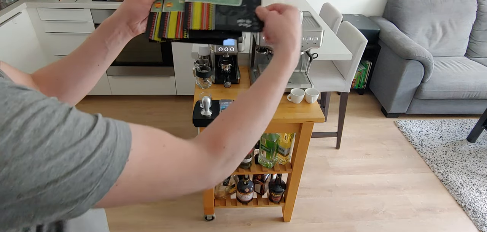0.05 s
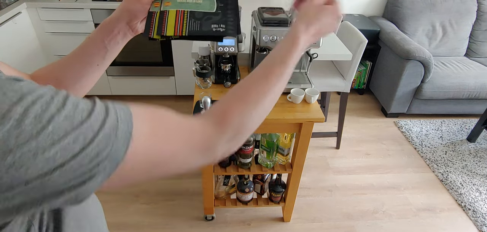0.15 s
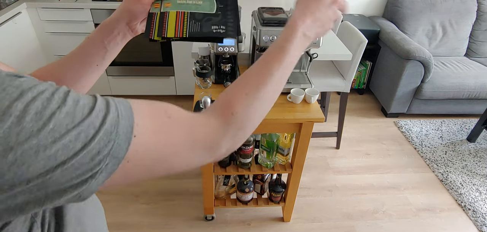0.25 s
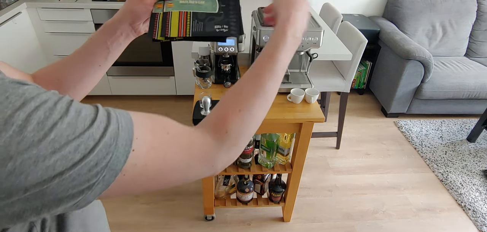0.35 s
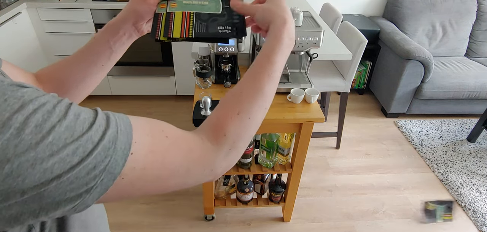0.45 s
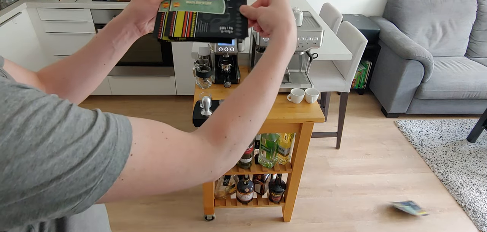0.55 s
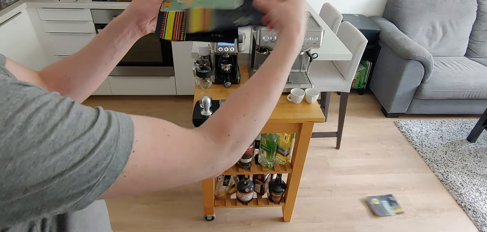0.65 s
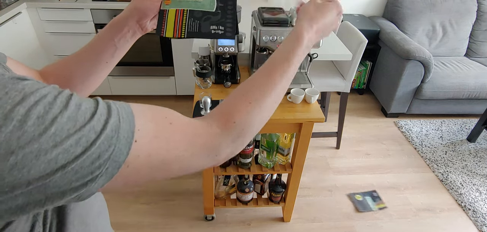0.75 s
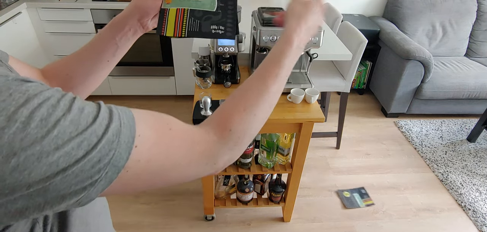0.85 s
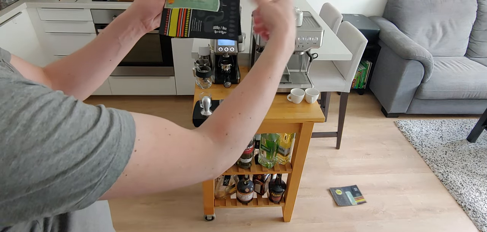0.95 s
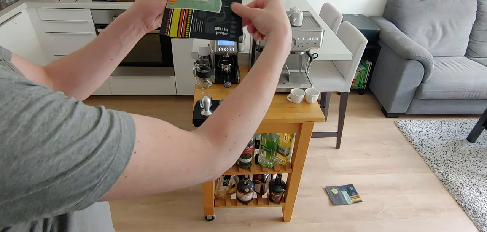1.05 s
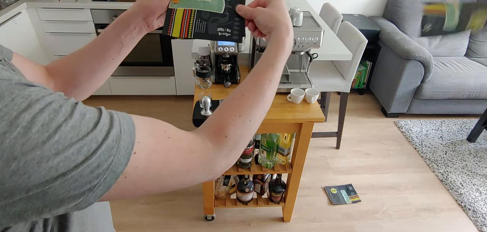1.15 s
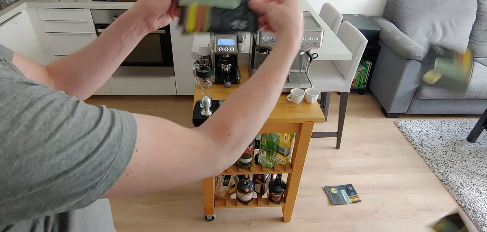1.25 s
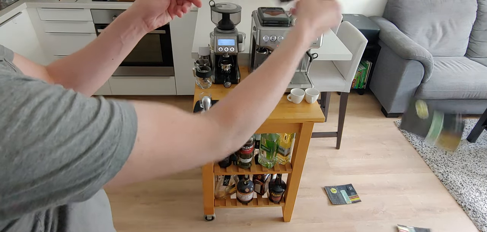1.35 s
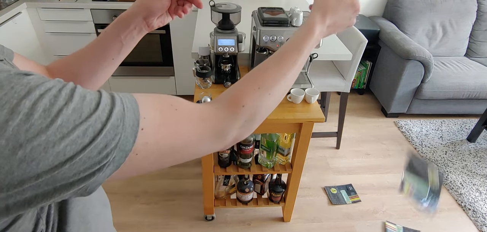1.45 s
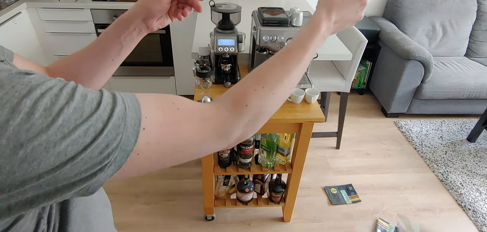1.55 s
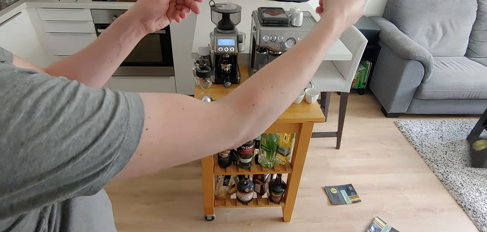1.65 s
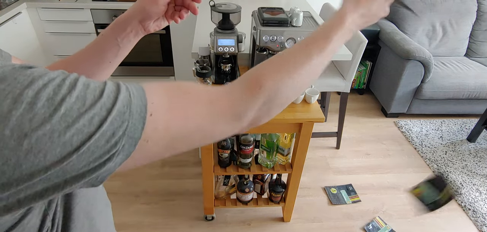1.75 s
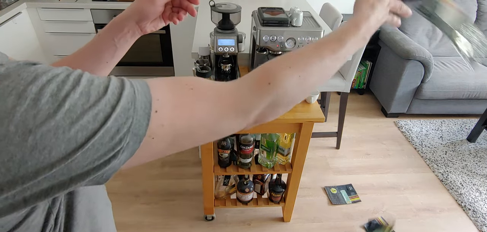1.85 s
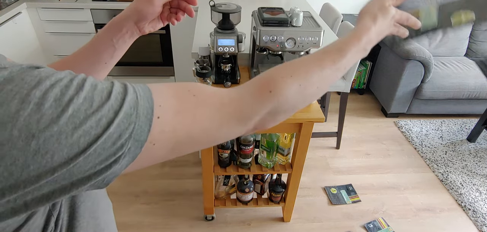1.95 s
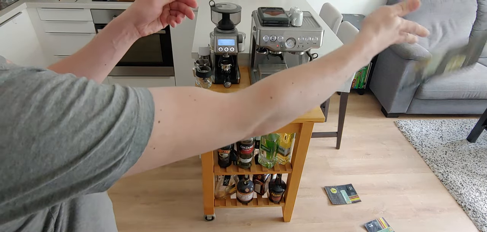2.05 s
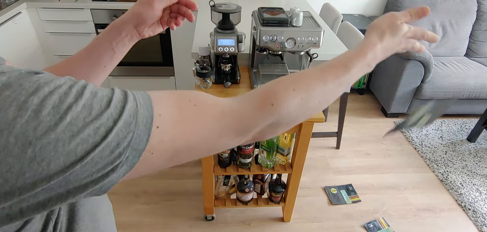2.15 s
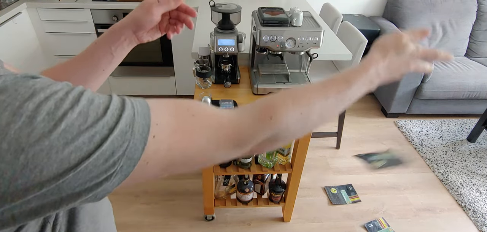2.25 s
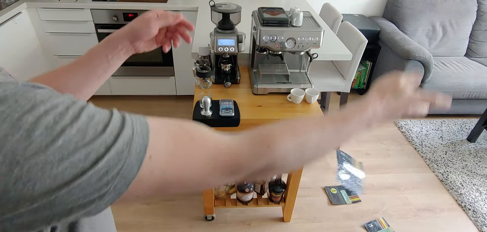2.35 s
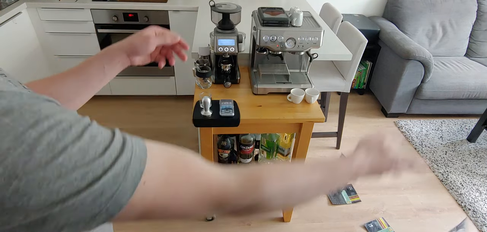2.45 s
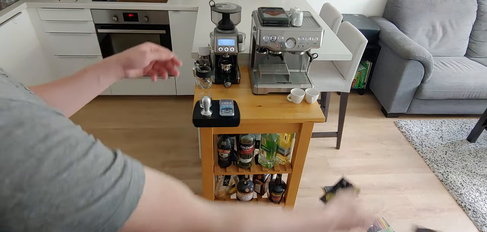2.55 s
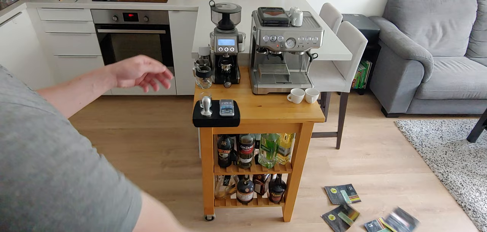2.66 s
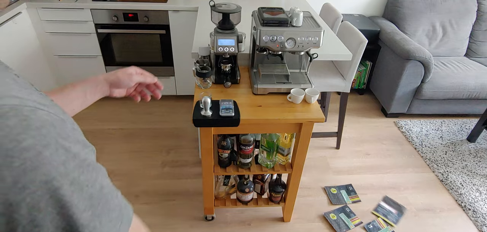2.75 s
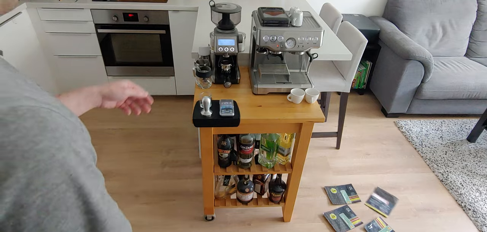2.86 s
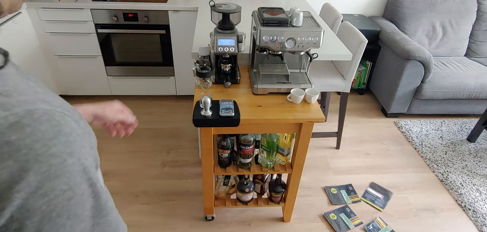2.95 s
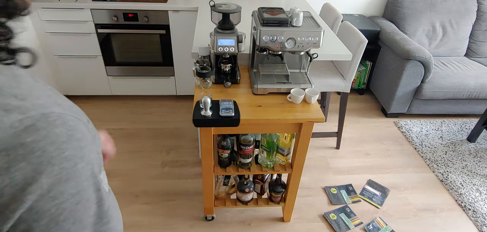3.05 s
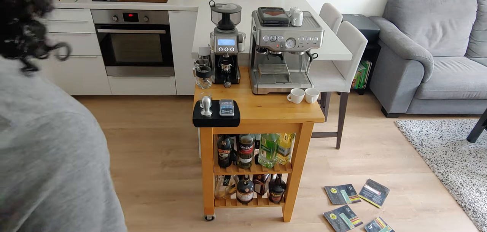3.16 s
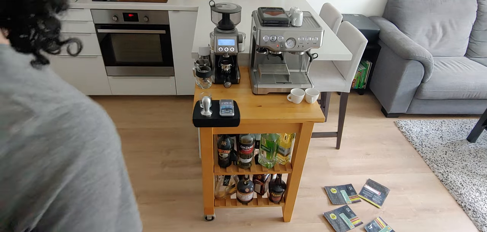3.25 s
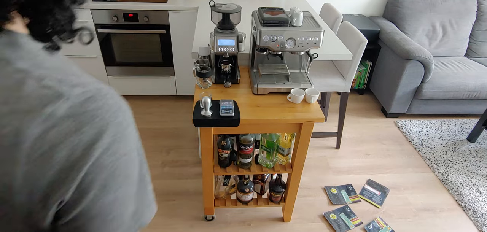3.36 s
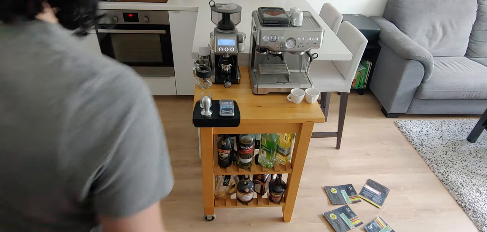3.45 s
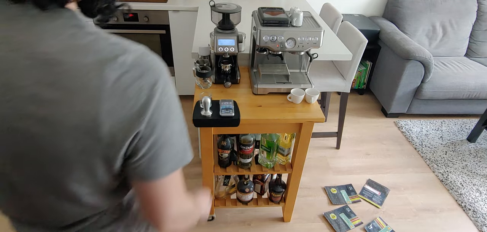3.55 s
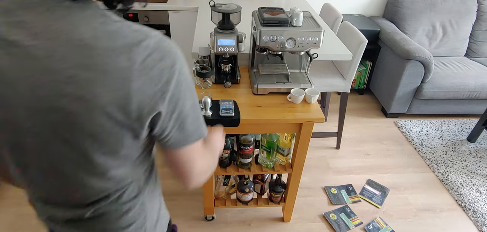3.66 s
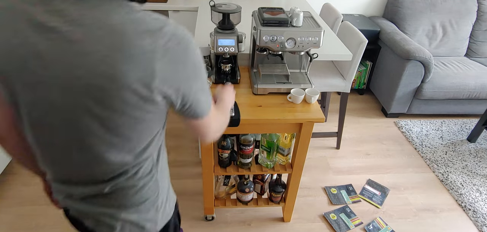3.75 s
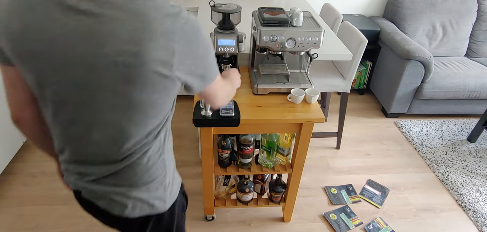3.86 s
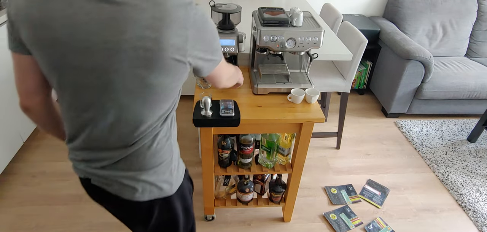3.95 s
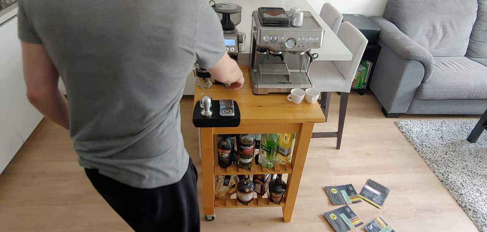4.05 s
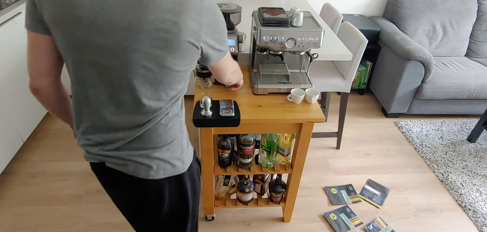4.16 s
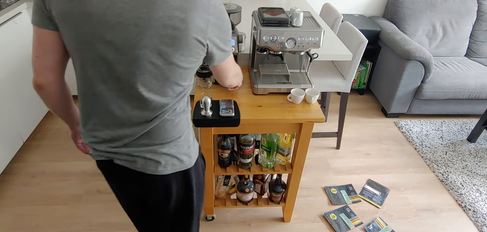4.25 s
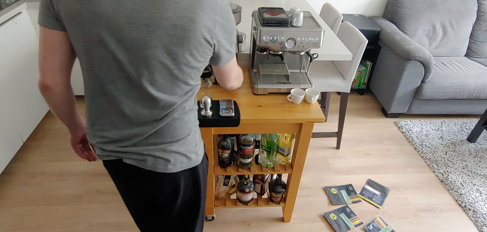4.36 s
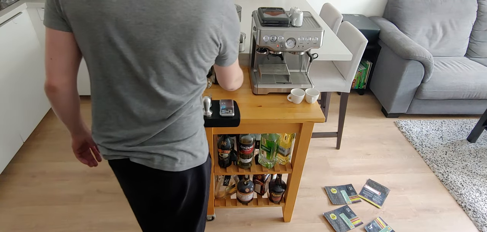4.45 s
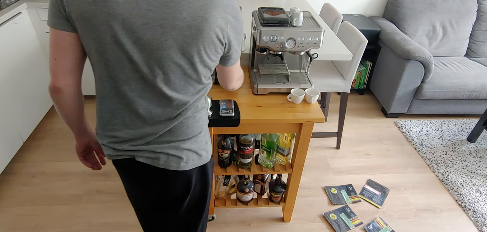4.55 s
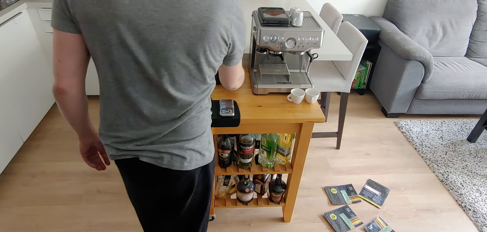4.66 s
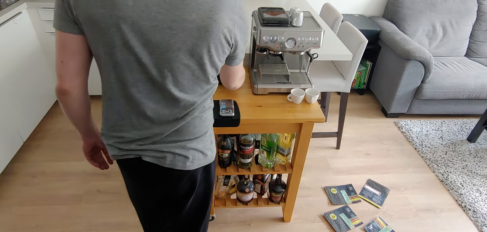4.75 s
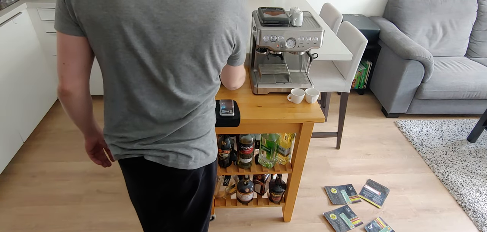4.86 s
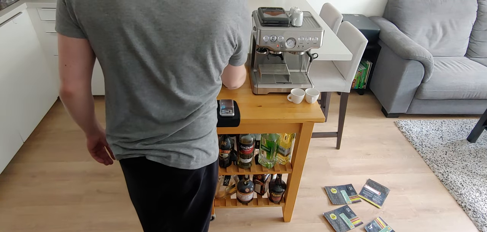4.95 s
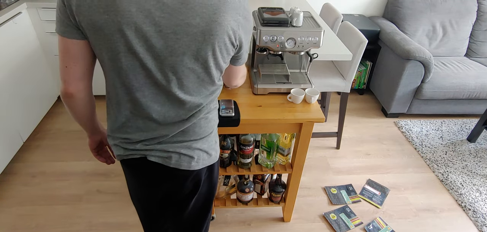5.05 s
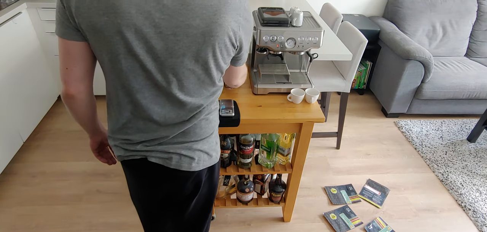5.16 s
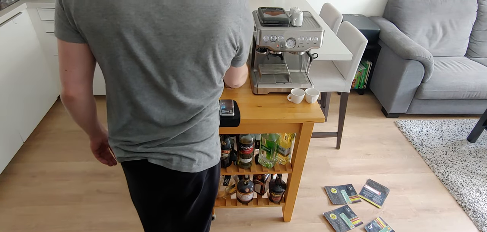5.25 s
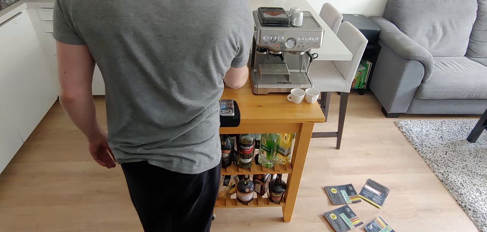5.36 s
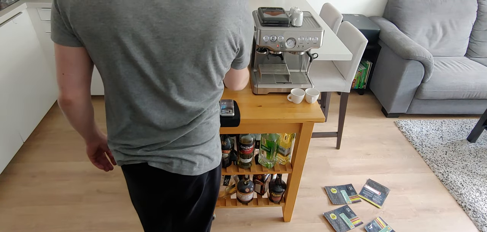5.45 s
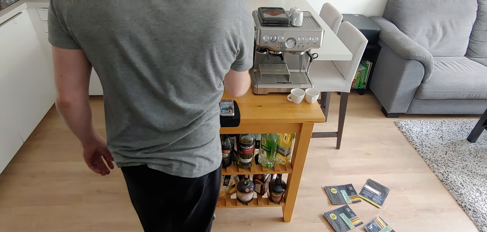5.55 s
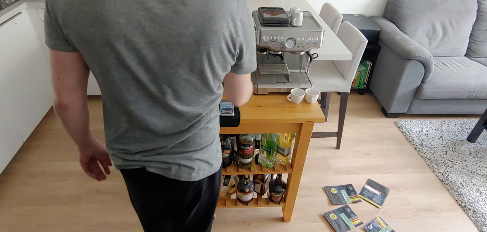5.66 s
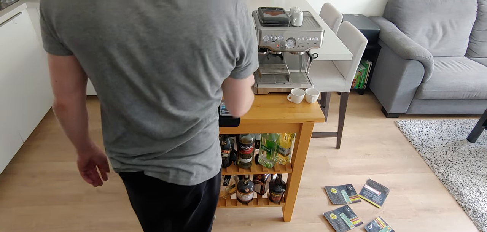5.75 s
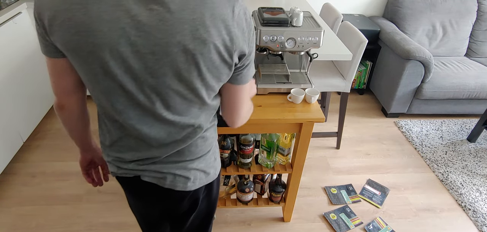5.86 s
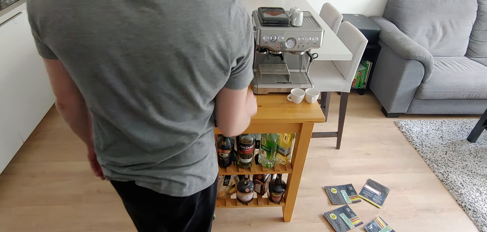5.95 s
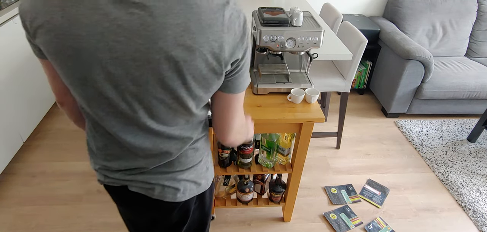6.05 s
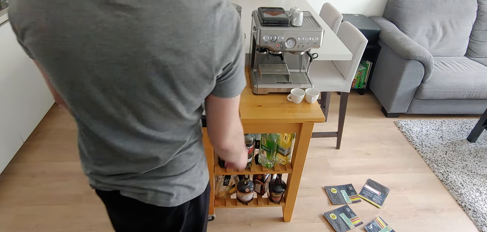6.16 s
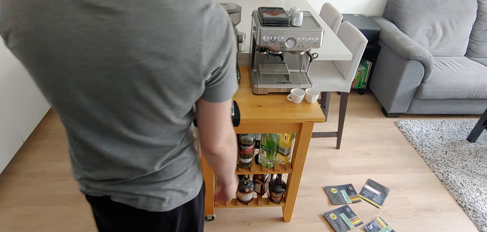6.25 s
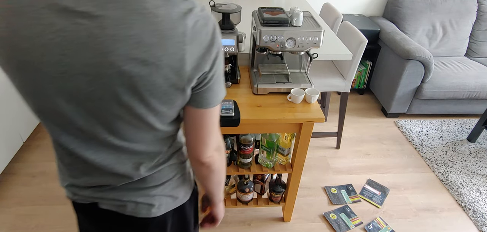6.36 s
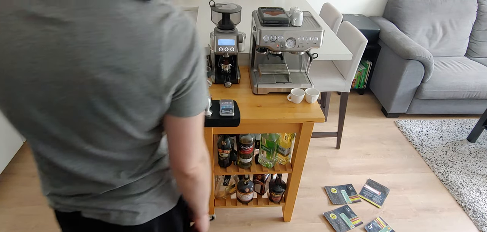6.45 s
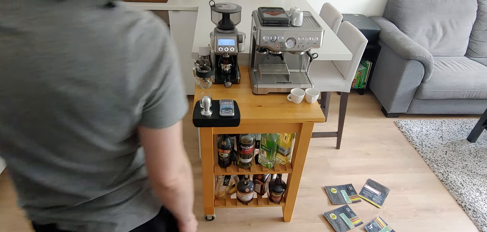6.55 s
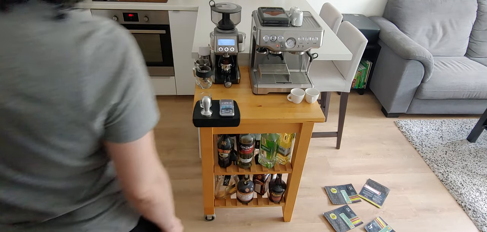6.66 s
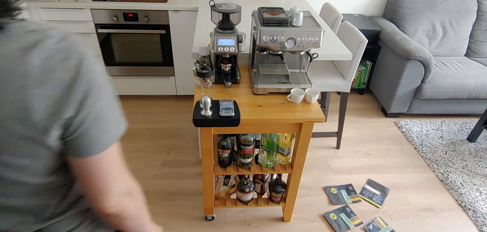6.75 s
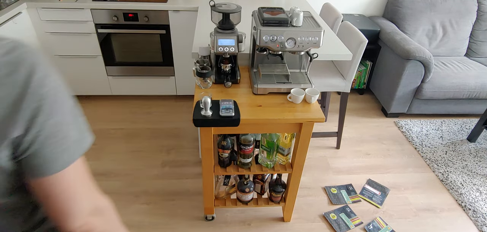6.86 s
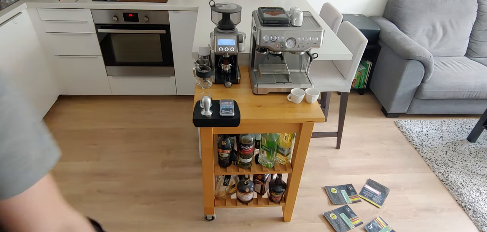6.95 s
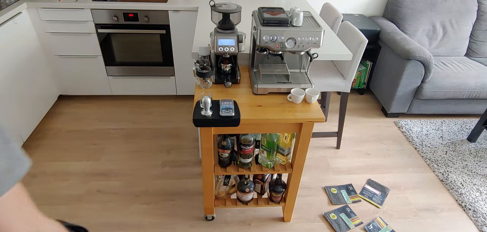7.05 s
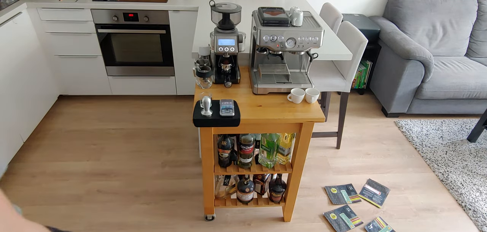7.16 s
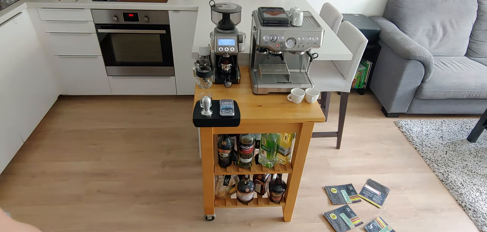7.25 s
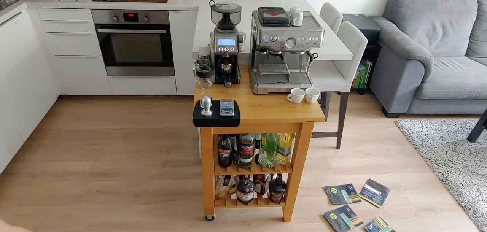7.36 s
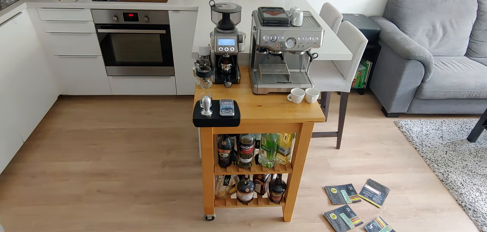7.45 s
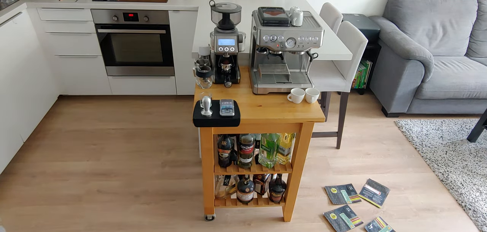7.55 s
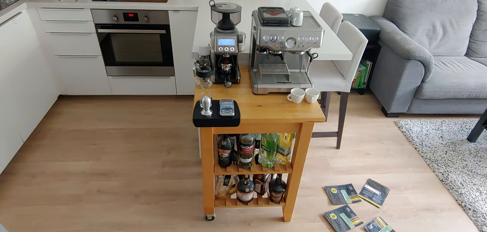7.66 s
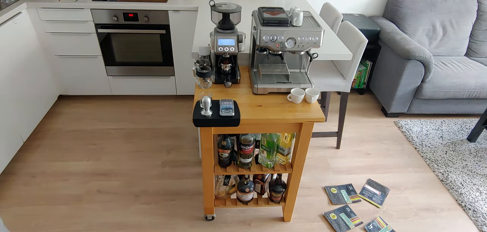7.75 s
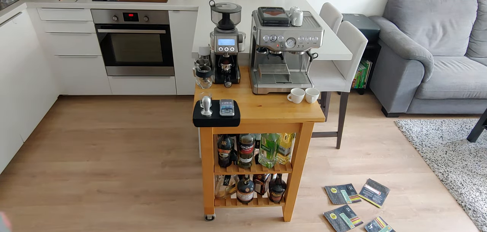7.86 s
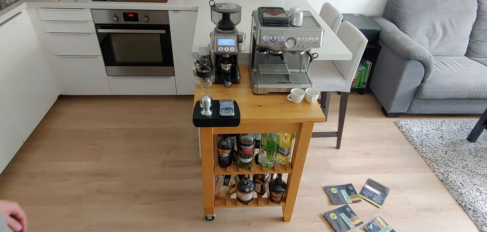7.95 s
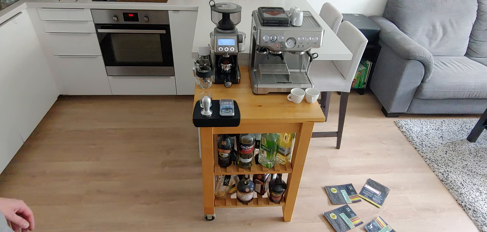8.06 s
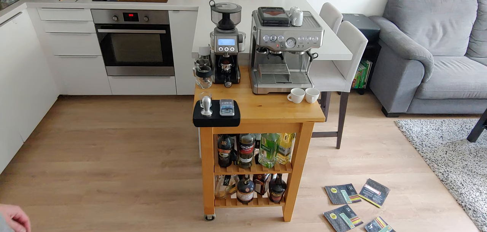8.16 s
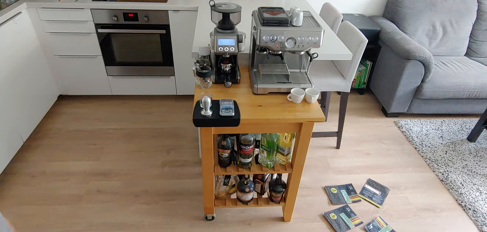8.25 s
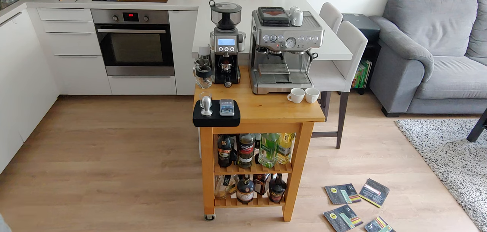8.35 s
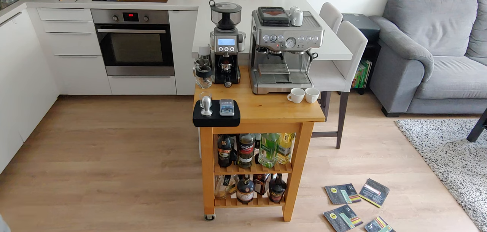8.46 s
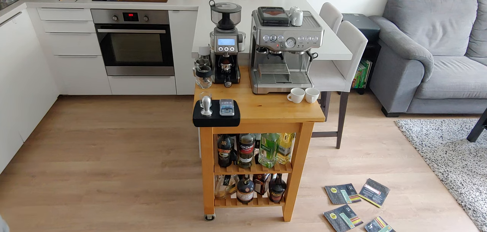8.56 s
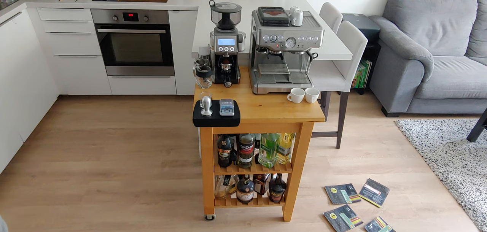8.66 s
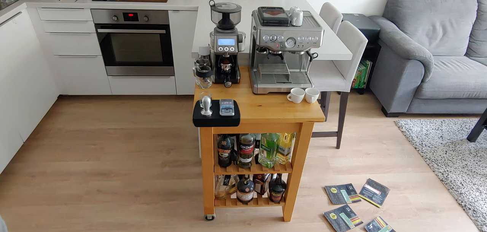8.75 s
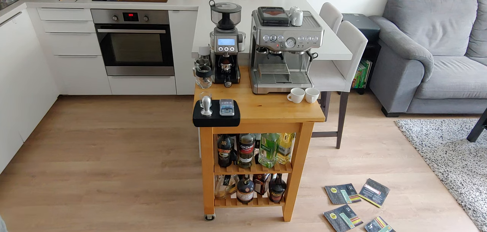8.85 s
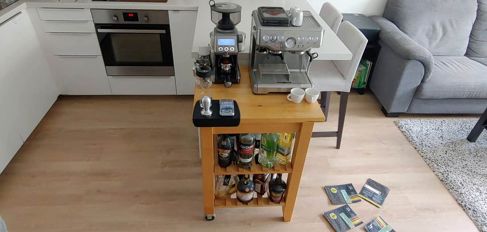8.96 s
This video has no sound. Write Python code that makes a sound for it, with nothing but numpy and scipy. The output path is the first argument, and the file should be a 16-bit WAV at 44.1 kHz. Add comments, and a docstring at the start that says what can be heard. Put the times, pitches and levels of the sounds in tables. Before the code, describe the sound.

Four sharp, papery foil slaps land on a wooden floor at the right, with light rustles and snapping folds between them. Things go quiet over low room rumble and hiss; a filter holder is seated with small clicks. A switch clicks and a coffee grinder roars up near the left, beans cracking in the burrs over a droning motor and swaying gear whine. Close stereo microphones, short lively room reflections.

```python
"""Close in a kitchen with a wooden floor: a fridge hums under low room rumble and a faint hiss.
Foil coffee packets, right of the microphone, rustle, are flicked off a stack and slap and skid on the boards.
Someone steps up to an electric burr grinder, slightly left, seats the filter holder and clicks it on.
Beans crack between the burrs and shake the housing, while the gears whine and sag with the load.
Foil is filtered clumps of clicks, beans are filtered random fractures, motor and gears are swaying sines."""
import sys
import numpy as np
from scipy import signal
from scipy.fft import rfft, irfft
from scipy.io import wavfile
from scipy.ndimage import uniform_filter1d

SR = 44100
rng = np.random.default_rng(int(sys.argv[2]) if len(sys.argv) > 2 else 0)


def persist_wave(psi):
    """Save psi, clipped to +-1, as 16-bit WAV."""
    counts = np.round(np.clip(psi, -1, 1) * 32767).astype(np.int16)
    wavfile.write(sys.argv[1], SR, np.atleast_2d(counts).T)


N = 397341
TIME = np.arange(N) / SR
GRID = np.fft.rfftfreq(16384, 1 / SR)  # f/Hz at which filter curves are drawn

# gear mesh at full speed, sagging with the load: t/s, f/Hz, whine relative level/dB
GEAR_MESH = [(5.03, 1790, -8), (5.28, 1810, -6), (5.42, 1920, -4), (5.56, 1815, -6), (5.76, 1815, -9),
             (5.94, 1890, -1), (6.1, 1875, -2), (6.28, 1830, -7), (6.47, 1860, -11), (6.61, 1905, -4),
             (6.98, 1865, -8), (7.2, 1855, -5), (7.46, 1965, -6), (7.58, 1920, 1), (7.82, 1865, 0),
             (8.06, 1925, 2), (8.22, 1945, 1), (8.43, 1945, -4), (8.62, 1900, -1), (8.8, 1870, -5),
             (9.0, 1940, -6)]
# colour of beans breaking in the burrs: f/Hz, relative level/dB
BEAN_COLOUR = [(200, -27.5), (600, -1), (950, -2.5), (1300, -4), (1600, -5.2), (2300, 1), (3000, -5.5),
               (4000, -8.2), (5300, -8.4), (6200, -17), (8000, -20.3), (10000, -31), (12000, -32.5),
               (14000, -64)]
# room sound against direct sound: f/Hz, ratio/dB
WET_RATIO = [(100, 0), (400, 2.5), (1000, 4), (2500, 9), (8000, 2)]
MOTOR_ON_S, BEANS_CAUGHT_S = 4.866, 4.898  # the motor idles for a moment before the burrs catch the beans
CRUNCH_RISE_S = 0.055  # time constant with which crunch and gear sound take up the load


def amp(db):
    """Decibels to gain."""
    return 10 ** (np.asarray(db) / 20)


def unit(x):
    """Scales to rms 1."""
    return x / np.sqrt(np.mean(x ** 2) + 1e-20)


def read(points, hz, column=1):
    """Reads a table on a log-frequency axis."""
    table = np.transpose(points)
    return np.interp(np.log(hz + 1), np.log(table[0]), table[column])


def follow(rows, column):
    """Reads a time curve at every sample."""
    table = np.transpose(rows)
    return np.interp(TIME, table[0], table[column])


def add(mix, s, sound):
    """Adds a sound at time s."""
    part = mix[max(round(s * SR), 0):][:len(sound)]
    part += sound[:len(part)]


def bumps(modes):
    """Resonances (f/Hz, width/Hz, height/dB) as a dB curve."""
    return sum(db / (1 + (2 * (GRID - hz) / width) ** 2) for hz, width, db in modes)


def colour(x, db):
    """Causal (minimum-phase) filter of unit energy with the given dB curve."""
    log_gain = np.log(amp(np.r_[db, db[-2:0:-1]]))
    ring = np.fft.ifft(np.exp(np.conj(signal.hilbert(log_gain)))).real[:len(GRID) - 1]
    return signal.oaconvolve(x, ring / np.linalg.norm(ring))[:len(x)]


def drift(hz):
    """Random wandering of rms 1, up to about the given rate."""
    size = 2 ** 19
    lowpass = 1 + (np.fft.rfftfreq(size, 1 / SR) / hz) ** 4
    return unit(irfft(rfft(rng.standard_normal(size)) / lowpass)[:N])


def grains(per_s, spread_db, size):
    """Random clicks, a few much larger than the rest."""
    strength = amp(spread_db * np.minimum(rng.exponential(1, size), 4))
    return strength * rng.choice([-1., 1.], size) * (rng.random(size) < per_s / SR)


def burst(x, db):
    """Gives a short sound the energy of a twentieth of a second at this level."""
    return amp(db) * x * np.sqrt(SR / 20 / (np.sum(x ** 2) + 1e-20))


def envelope(swell, hold, fade):
    """Straight rise, hold, exponential fade."""
    t = TIME[:SR // 2]
    return np.minimum(t / swell, 1) * np.exp(-np.maximum(t - swell - hold, 0) / fade)


def rise(start_s, rise_s):
    """Goes from 0 towards 1 exponentially, starting at start_s."""
    return 1 - np.exp(-np.maximum(TIME - start_s, 0) / rise_s)


def background(air_db=-69):
    """Low room rumble and a faint hiss are coloured noise; the fridge's mains hum is two slowly swaying sines."""
    # room air: f/Hz, relative level/dB
    air_colour = [(12, -32), (35, -18.5), (49, 6.5), (65, -1.5), (85, -8), (130, -13), (300, -18),
                  (1200, -22.5), (2000, -26.5), (5000, -29.5), (8000, -42), (14000, -40.5)]
    # fridge hum: f/Hz, level/dB
    fridge_tones = [(99.5, -69), (146, -98.5)]
    # the first second is dropped, so the filter has settled
    air = amp(air_db) * colour(rng.standard_normal(N + SR), read(air_colour, GRID))[SR:]
    hum = sum(amp(db) * np.sqrt(2) * np.sin(2 * np.pi * hz * TIME) for hz, db in fridge_tones)
    return air, hum * amp(.7 * drift(hz=2))


def crumple(shape, db, tilt, modes, creases_per_s=3000, thinning=.3, facet_width=.22, count=6):
    """Foil buckles in clumps of tiny creases, its facets ringing at several pitches; gentle handling makes fewer."""
    clump_db, clump_s, facet_ring_db = 4.5, 0.014, 11
    # foil wall: f/Hz, relative level/dB
    foil_colour = [(30, -21), (70, -10), (150, -3.5), (300, -3), (600, 1.5), (1000, -0.5), (1500, -0.5),
                   (2000, 2.5), (2600, -1.5), (3300, -1), (5000, -3.5), (7000, -14), (9000, -20),
                   (14000, -37)]
    wall = read(foil_colour, GRID) + tilt * np.log2(np.maximum(GRID, 150) / 1000) + bumps(modes)
    size = len(shape)
    facet_creases_per_s = creases_per_s / count * amp(thinning * (db + 30))
    out = np.zeros(size)
    for hz in np.geomspace(1300, 6000, count) * rng.uniform(.85, 1.15, count):
        clumps = unit(uniform_filter1d(rng.standard_normal(size), round(clump_s * SR)))
        creases = shape * amp(clump_db * clumps) * grains(facet_creases_per_s, spread_db=3.3, size=size)
        out += colour(creases, wall + bumps([(hz, facet_width * hz, facet_ring_db)]))
    return burst(out, db)


def packets(ring_width=0.16):
    """Packets crinkle and rustle, slap the floor and skid; one takes a glancing blow and rings hollowly."""
    swell_share = 0.27  # a crinkle swells for this share of its length; the rest sets its fade
    crinkle_ring_db, landing_ring_db, landing_fade_s = 5, 4.5, 0.024
    # foil crinkles and rustles as packets are handled and flicked:
    # t/s, relative level/dB, length/s, tilt/(dB per octave), ring f/Hz
    crinkles = [(0.0, -57.5, 0.08, 3.5, 3830), (0.084, -54.5, 0.05, -1, 3800),
                (0.172, -41, 0.012, -0.5, 450), (0.722, -41, 0.05, -0.5, 1100),
                (0.764, -37.5, 0.045, 2.6, 6000), (0.962, -66, 0.13, 5.5, 2000),
                (1.12, -65, 0.018, 1.5, 500), (1.21, -67, 0.037, 9, 3300), (1.254, -53, 0.1, 3, 3300),
                (1.562, -44, 0.03, -2, 190), (1.722, -42.5, 0.18, 5.5, 7000),
                (1.785, -35.5, 0.087, -1, 600), (2.06, -60, 0.2, 9, 11000), (2.218, -37, 0.059, 1.5, 603),
                (2.632, -40, 0.039, 3.5, 3450)]
    # slap and skid: t/s, relative level/dB, swell/s, skid/s, tilt/(dB per octave), ring f/Hz
    slaps = [(0.54, -26.8, 0.007, .003, -1.8, 950), (1.356, -25.4, 0.022, 0.041, 0.6, 2070),
             (1.924, -22.7, 0.028, 0.031, 0.6, 2150), (2.671, -28.9, 0.009, 0.09, 1.8, 2120)]
    # glancing blow, one row: t/s, relative level/dB, swell/s, fade/s, tilt/(dB per octave)
    glancing_blow = (2.426, -37.5, 0.02, 0.02, 2.8)
    # hollow ring of the packet: f/Hz, width/Hz, height/dB
    hollow_modes = [(603, 100, 8), (1770, 220, 5), (2360, 260, 8), (2850, 320, 7), (4060, 300, 4),
                    (5030, 400, 6), (7000, 1200, 4)]
    out = np.zeros(N)
    for s, db, length, tilt, hz in crinkles:
        shape = envelope(swell_share * length, 0, (1 - swell_share) * length)
        add(out, s, crumple(shape, db, tilt, [(hz, ring_width * hz, crinkle_ring_db)]))
    for s, db, swell, skid, tilt, hz in slaps:
        shape = envelope(swell, skid, landing_fade_s)
        add(out, s, crumple(shape, db, tilt, [(hz, ring_width * hz, landing_ring_db)]))
    s, db, swell, fade, tilt = glancing_blow
    add(out, s, crumple(envelope(swell, 0, fade), db, tilt, hollow_modes))
    return out


def snaps(snap_db=-18.2):
    """Stiff folds flip over, chatter for an instant and ring; gentle ones are duller."""
    chatter_fade_s, ring_share = 0.001, 0.25  # ring width is this share of its pitch
    dulling = 0.3  # dB per octave above 3 kHz, for each dB below -24 in the table
    # folds: t/s, level/dB ahead of snap_db, ring f/Hz, ring height/dB
    folds = [(0.091, -43, 2450, 4), (0.122, -47, 1873, 4), (0.135, -32.5, 1740, 14), (0.173, -25.5, 550, 6),
             (0.542, -17.5, 950, 8), (0.548, -17, 1990, 9), (0.556, -16.5, 1700, 11), (0.560, -19, 585, 16),
             (0.573, -21, 2300, 13), (0.635, -30, 560, 14), (0.661, -31, 600, 14), (0.729, -26.5, 500, 14),
             (0.736, -24.5, 590, 11), (0.741, -23.5, 3136, 16), (0.764, -24.5, 2320, 5),
             (0.800, -25.5, 2290, 6), (1.123, -49, 600, 6), (1.288, -39, 1677, 13), (1.327, -35, 2247, 11),
             (1.369, -26, 1840, 10), (1.376, -16, 2080, 11), (1.411, -19, 2080, 12), (1.431, -22, 1900, 13),
             (1.469, -27, 1900, 13), (1.493, -31, 950, 11), (1.566, -33, 1170, 14), (1.577, -34, 1500, 10),
             (1.864, -33, 1300, 12), (1.933, -27, 830, 13), (1.942, -23, 1220, 13), (1.954, -16, 1950, 11),
             (1.967, -18, 1700, 11), (1.994, -15, 2150, 15), (2.221, -33, 1890, 5),
             (2.641, -25.5, 3450, 26), (2.739, -20.5, 3450, 25), (2.768, -16, 1830, 15)]
    # colour of a fold: f/Hz, relative level/dB
    fold_colour = [(100, -14), (400, 0.5), (1000, 1.5), (2500, 3.5), (5000, -0.5), (7500, -8.5),
                   (10000, -16), (14000, -33)]
    out, t = np.zeros(N), TIME[:SR // 8]
    for s, db, hz, ring_db in folds:
        treble = dulling * min(db + 24, 0) * np.log2(np.maximum(GRID, 3000) / 3000)
        fold = read(fold_colour, GRID) + treble + bumps([(hz, ring_share * hz, ring_db)])
        chatter = grains(per_s=4000, spread_db=1.0, size=len(t)) * np.exp(-t / chatter_fade_s)
        flip = signal.unit_impulse(len(t)) + chatter
        add(out, s + .002, burst(colour(flip, fold), db + snap_db))
    return out


def floorboards(swell_s=0.03, fade_s=0.07):
    """Weight and landings push the floor, which swings at a low mode and settles."""
    # soft thuds on the boards: t/s, level/dB, f/Hz
    thud_rows = [(0.545, -55.5, 60), (0.749, -50.5, 52.7), (0.96, -61, 54.7), (1.22, -58.5, 50.4),
                 (2.25, -65, 60), (2.65, -48.5, 110.6), (3.761, -56, 51.4)]
    out, t = np.zeros(N), TIME[:SR // 2]
    for s, db, hz in thud_rows:
        swing = np.sin(2 * np.pi * hz * t) * (1 - np.exp(-t / swell_s)) * np.exp(-t / fade_s)
        add(out, s, burst(swing, db))
    return out


def clicks():
    """Hard little knocks on metal and plastic are fading coloured noise; the steel rings on in sines."""
    # filter holder, switch, one hard bean: t/s, relative level/dB, fade/s, rings as (f/Hz, width/Hz, height/dB)
    knock_rows = [(4.258, -72, 0.04, [(2800, 1500, 3), (4700, 994, 9.5), (7000, 1200, 7)]),
                  (4.386, -59.5, 0.011, [(1260, 600, 12), (2000, 1000, 21), (3000, 900, -6),
                  (7500, 3000, -6)]), (4.638, -73, 0.03, [(1000, 600, 12)]),
                  (4.66, -75, 0.02, [(3500, 2000, 6), (6200, 1500, 10)]),
                  (4.678, -60.5, 0.002, [(1410, 400, 3), (2950, 700, 3), (4250, 900, 11), (5900, 800, 9),
                  (6950, 700, 8)]), (4.826, -59, 0.0025, [(2250, 600, 8), (3000, 450, 11), (3456, 300, 12),
                  (4350, 500, 11), (7100, 1100, 19)]), (7.157, -42.5, 0.014, [(7200, 2000, 16),
                  (10700, 3500, 11)])]
    # colour of a knock: f/Hz, relative level/dB
    knock_colour = [(100, -18.5), (350, 6), (1000, 1), (2500, 4), (5000, -5), (7500, -12), (10000, -16),
                    (14000, -26)]
    # steel filter holder and switch: t/s, relative level/dB, f/Hz, fade/s
    steel_tones = [(4.678, -65.5, 1793, 0.04), (4.678, -70, 4200, 0.018), (4.826, -59, 3456, 0.011),
                   (4.826, -66, 6794, 0.008)]
    out, t = np.zeros(N), TIME[:SR // 4]
    for s, db, fade, rings in knock_rows:
        knock = rng.standard_normal(len(t)) * np.exp(-t / fade)
        add(out, s, burst(colour(knock, read(knock_colour, GRID) + bumps(rings)), db))
    for s, db, hz, fade in steel_tones:
        add(out, s, burst(np.sin(2 * np.pi * hz * t) * np.exp(-t / fade), db))
    return out


def loading(rise_s, empty_db):
    """Gain of one grinder sound: the motor idles, the burrs catch the beans, then slowly fill."""
    kick_s, fill_s = 0.006, 0.83  # time constants of the motor's first jolt and of the filling burrs
    idle = amp(-14.5)  # against grinding
    running = idle * rise(MOTOR_ON_S, kick_s) + (1 - idle) * rise(BEANS_CAUGHT_S, rise_s)
    return running * amp(empty_db * (1 - rise(BEANS_CAUGHT_S, fill_s)))


def resonate(x, hz, width):
    """A resonance that follows the curve hz."""
    turn, r = np.exp(2j * np.pi * np.cumsum(hz) / SR), np.exp(-np.pi * width / SR)
    return unit((turn * signal.lfilter([1], np.poly([r, r]), x / turn)).real)


def burr_bite(mesh_hz, tooth_depth=0.28, lopsided_depth=0.16, feed_db=1.2):
    """Beans are drawn in unevenly, pinched by each breaker tooth and twice a turn by the uneven gap."""
    turns_per_s, teeth = 16, 3  # speed of the cone burr at the average mesh pitch; its breaker teeth
    turns = np.cumsum(mesh_hz / follow(GEAR_MESH, 1).mean()) * turns_per_s / SR
    tooth_pinch = tooth_depth * np.cos(2 * np.pi * teeth * turns)
    gap_squeeze = lopsided_depth * np.cos(2 * np.pi * 2 * turns)
    return amp(feed_db * drift(hz=36.0)) * (1 + tooth_pinch + gap_squeeze)


def housing_shake(bite, surge_db, level_db=-30.2, surge_share=0.4):
    """Big fractures shake housing and trolley; their rumble builds only as the burrs take up the load."""
    # housing: f/Hz, relative level/dB
    body_colour = [(12, -50), (30, -52), (50, -53), (75, -16.5), (135, -25.5), (185, -7.5), (250, -5.5),
                   (340, 0), (500, 3.8), (650, -7.5), (850, -12.5), (1100, -17), (2000, -32.5), (5000, -57)]
    # resonances of housing and trolley: f/Hz, width/Hz, height/dB
    body_modes = [(73, 6.7, 9), (111, 6, 12), (193, 13, 6), (220, 10, 3), (257, 14, -5), (284, 16, 6),
                  (338, 34, 5.5), (372, 26, 3), (406, 20, -9), (467.8, 30, 5), (502, 12, -15), (562, 24, 8),
                  (790, 31, 8), (848, 41, -24)]
    fractures = unit(bite * grains(per_s=1500, spread_db=2.5, size=N))
    shake = colour(fractures, read(body_colour, GRID) + bumps(body_modes))
    rumble = signal.sosfiltfilt(signal.butter(4, 270, fs=SR, output="sos"), shake)
    shake = shake - rumble * (1 - rise(BEANS_CAUGHT_S, 0.11))
    return amp(level_db + surge_share * surge_db) * loading(rise_s=0.03, empty_db=-3.8) * shake


def motor_drone(speed, bite, surge_db, motor_hz=331, waver=0.026, level_db=-38.3):
    """The motor drones in the housing as a wavering sine, swelling with each bite and surge."""
    motor_pitch = motor_hz * speed * (1 + waver * drift(hz=29.0))
    motor = np.sqrt(2) * np.sin(2 * np.pi * np.cumsum(motor_pitch) / SR)
    return amp(level_db + surge_db) * loading(rise_s=0.1, empty_db=-4) * bite * motor


def bean_crunch(bite, level_db=-28.1):
    """Small fractures hiss in the burrs; the treble builds gradually from the motor's start."""
    # resonances of the burrs: f/Hz, width/Hz, height/dB
    steel_modes = [(972, 110, 8), (1040, 60, 1.5), (1188, 65, 6), (1335, 100, 5), (1835, 184, 5),
                   (2075, 40, 2), (2311, 70, 0.7), (2738, 30, 4), (5380, 180, 2.5)]
    crumbs = unit(bite * grains(per_s=7000, spread_db=3.2, size=N))
    coloured = colour(crumbs, read(BEAN_COLOUR, GRID) + bumps(steel_modes))
    crunch = amp(level_db) * loading(CRUNCH_RISE_S, empty_db=-4.6) * coloured
    treble = signal.sosfiltfilt(signal.butter(2, 3000, "highpass", fs=SR, output="sos"), crunch)
    return crunch - treble * (1 - rise(MOTOR_ON_S, 0.06))


def gears(mesh_hz, bite, judder=0.006, whine_db=-35, half_mesh_db=-44, rasp_db=-42):
    """Meshing teeth whine, with a tone an octave below and a rasp; an off-centre gear sways the tone once a turn."""
    gear_teeth, wobble_rad = 54, 0.55
    phase = 2 * np.pi * np.cumsum(mesh_hz * (1 + judder * drift(hz=46.0))) / SR
    swaying = np.sin(phase + wobble_rad * np.sin(phase / gear_teeth))
    whine = amp(whine_db + follow(GEAR_MESH, 2)) * swaying
    tone = np.sqrt(2) * (whine + amp(half_mesh_db) * np.sin(phase / 2))
    rasp = amp(rasp_db) * resonate(rng.standard_normal(N), mesh_hz, width=120)
    return loading(CRUNCH_RISE_S, empty_db=-3) * bite * (tone + rasp)


def grinder(spin_up_s=0.04, mains_hz=99.7, mains_db=-61):
    """Motor and gears spin up, then the bite of the burrs drives every sound except the motor field's mains hum."""
    # a big bean wedges (+) or the feed skips (-): t/s, change/dB, half length/s
    load_surges = [(5.23, -5, .04), (5.55, 6, .07), (5.67, -12, .04), (5.75, 4, .04), (5.95, 5, .09),
                   (6.35, -7, .07), (6.49, 3, .05), (7.02, 2, .09), (7.3, -6, .06), (7.46, 5, .05),
                   (7.61, -4, .05), (7.94, 4.5, .06), (8.38, 4, .05), (8.86, -4, .13)]
    speed = rise(MOTOR_ON_S, spin_up_s)
    mesh_hz = speed * follow(GEAR_MESH, 1)
    bite = burr_bite(mesh_hz)
    surge_db = sum(db * np.exp(-((TIME - s) / length) ** 2) for s, db, length in load_surges)
    mains = amp(mains_db) * speed * np.sqrt(2) * np.sin(2 * np.pi * mains_hz * TIME)
    beans = housing_shake(bite, surge_db) + bean_crunch(bite)
    return beans + motor_drone(speed, bite, surge_db) + gears(mesh_hz, bite) + mains


def cracks(ring_width=.35, ring_db=10, fade_s=0.004):
    """Whole beans burst between the burrs, each in a spray of splinters with a pitch of its own."""
    per_s, typical_db, spread_db = 19, -44, 3  # the lesser ones come at random
    # loud bursts: t/s, level/dB, ring f/Hz
    loud_beans = [(4.951, -43, 1000), (5.062, -38, 2200), (5.077, -37, 1100), (5.466, -35, 970),
                  (6.743, -37, 1880), (6.876, -36, 940), (6.964, -38, 2320), (7.053, -36, 1130),
                  (7.202, -37, 965), (7.267, -36, 915), (7.345, -37, 980), (7.87, -36, 1150),
                  (8.155, -37, 1900), (8.385, -36, 1900), (8.572, -36, 1920), (8.796, -34, 930)]
    out, t = np.zeros(N), TIME[:SR // 8]
    draws = rng.random((160, 3))
    times = BEANS_CAUGHT_S + np.cumsum(-np.log(1 - draws[:, 0])) / per_s
    levels = typical_db + spread_db * (4 * draws[:, 1] - 2)
    pitches = 600 * 7 ** draws[:, 2]
    lesser = [row for row in zip(times, levels, pitches) if row[0] < TIME[-1]]
    for s, db, hz in loud_beans + lesser:
        splinters = grains(per_s=4000, spread_db=2.5, size=len(t)) * np.exp(-t / fade_s)
        ringing = read(BEAN_COLOUR, GRID) + bumps([(hz, ring_width * hz, ring_db)])
        add(out, s, burst(colour(splinters, ringing), db))
    return out


def direct(x, lead_s):
    """The straight path, which reaches the left port lead_s before the right (negative: after it)."""
    gain = 1 / np.sqrt(1 + amp(read(WET_RATIO, GRID)) ** 2)
    left = colour(x, 20 * np.log10(gain)) * np.sqrt(np.mean(gain ** 2))
    late = np.clip(np.arange(N) - round(lead_s * SR), 0, N - 1)
    return np.array([left, left[late]])


def tail(build_s=0.0027):
    """Dense reflections from hard walls along one path; the bass is alike on both sides."""
    # decay time of the kitchen: f/Hz, T60/s
    decay_times = [(100, 0.77), (400, 0.46), (1000, 0.41), (2500, 0.41), (7000, 0.37), (13000, 0.37)]
    # left-right likeness: f/Hz, correlation
    likeness = [(100, 1), (350, 0.7), (800, 0.25), (1500, 0.043), (9000, 0.11)]
    t = TIME[:SR * 3 // 4]
    hits = rng.choice([-1., 1.], (2, len(t))) * (rng.random((2, len(t))) < 4000 / SR)
    taps = hits * (1 - np.exp(-t / build_s))
    hz, at, z = signal.stft(taps, SR, nperseg=256)
    same = np.clip(read(likeness, hz), -1, 1)[:, None]
    z[0] = same * z[1] + np.sqrt(1 - same ** 2) * z[0]
    wet = amp(read(WET_RATIO, hz))[:, None]
    decay = amp(-60 * at / read(decay_times, hz)[:, None])
    # even out the energy of every band before the wet share is set
    shape = decay / np.sqrt(np.sum(decay ** 2, 1, keepdims=True) * 128 * np.mean(taps ** 2))
    return signal.istft(z * shape * wet / np.sqrt(1 + wet ** 2), SR, nperseg=256)[1]


def reflections(x, count=4):
    """Sound leaves from ever-changing surfaces, so it is shared among several paths round the room."""
    shares = np.array([drift(hz=7) for _ in range(count)])
    shares /= np.linalg.norm(shares, axis=0)
    return sum(signal.oaconvolve((share * x)[None], tail(), axes=1)[:, :N] for share in shares)


def scene(foil_db=1.0, snap_direct_db=2.0, click_direct_db=4.0):
    """Packets right, grinder slightly left, one room; snaps and clicks beam towards the microphone."""
    air, hum = background()
    foil, folds, knocks = amp(foil_db) * packets(), snaps(), clicks()
    machine = grinder() + cracks()
    from_right = direct(foil + amp(snap_direct_db) * folds, lead_s=-7e-5)
    from_left = direct(machine + amp(click_direct_db) * knocks + air, lead_s=6e-5)
    room = reflections(foil + folds + knocks + machine + air)
    return from_right + from_left + room + floorboards() + hum


def record(dry, edge_hz=14700):
    """Each microphone port has its own colour; then a low-pass limits the band."""
    # microphone ports: f/Hz, left level/dB, right level/dB
    port_colour = [(300, -1.5, 4.5), (750, -3, 0.5), (1200, 0.5, 5), (1800, -8, 4), (3300, -4, 3),
                   (5030, -5.5, -2), (6260, -4, 1), (7075, -11.5, 13), (7880, -13, 2), (8460, -18.5, -14),
                   (9140, -10, -10), (10000, 5, -14.5), (10500, -15.5, -12.5), (10900, 2.5, 2),
                   (12200, 4, -7), (13000, -11, -3)]
    curves = [read(port_colour, GRID, column=1 + side) for side in range(2)]
    heard = np.array([colour(x, db) * np.sqrt(np.mean(amp(db) ** 2)) for x, db in zip(dry, curves)])
    lowpass = signal.firwin(301, edge_hz, window=("kaiser", 9), fs=SR)
    return signal.oaconvolve(heard, lowpass[None], "same")


dry = scene()
out = record(dry)
persist_wave(out)
```